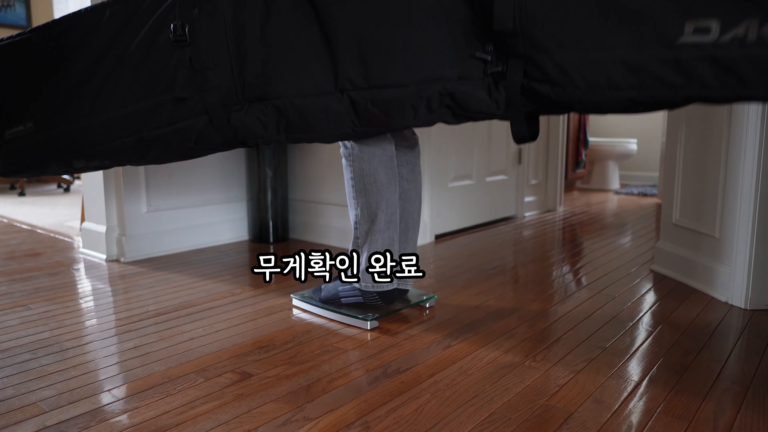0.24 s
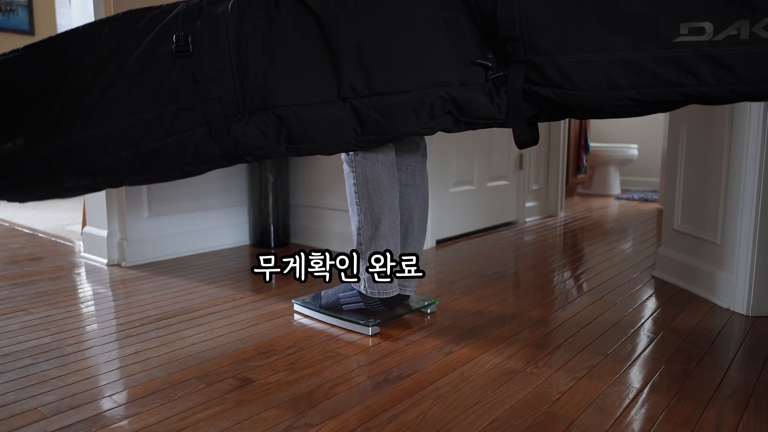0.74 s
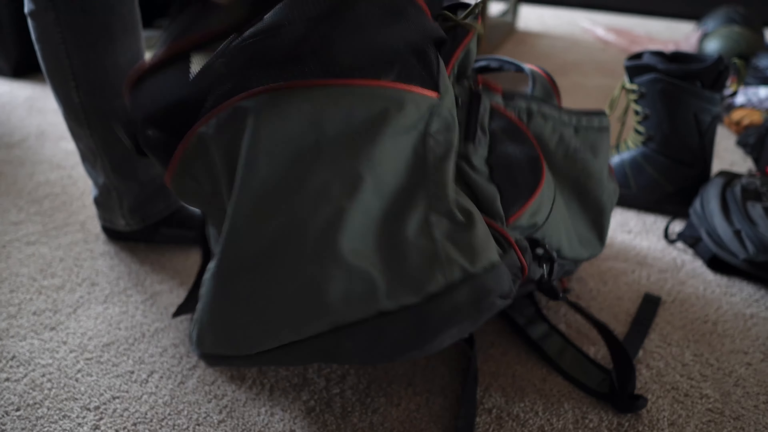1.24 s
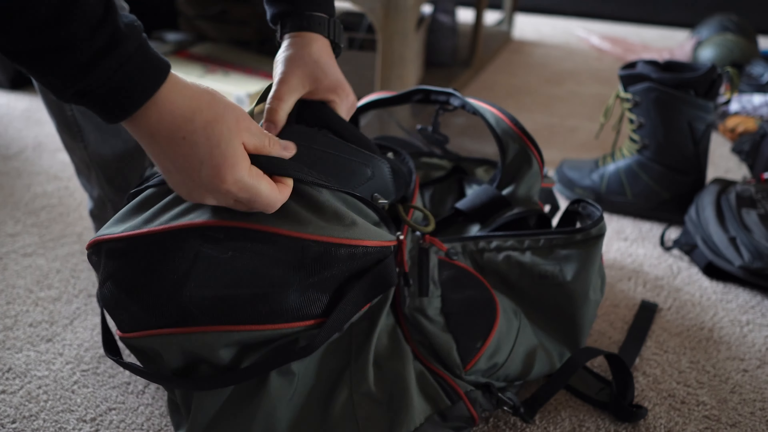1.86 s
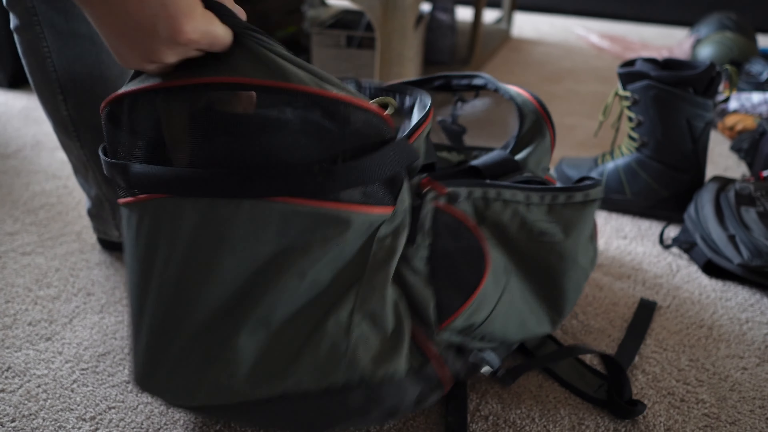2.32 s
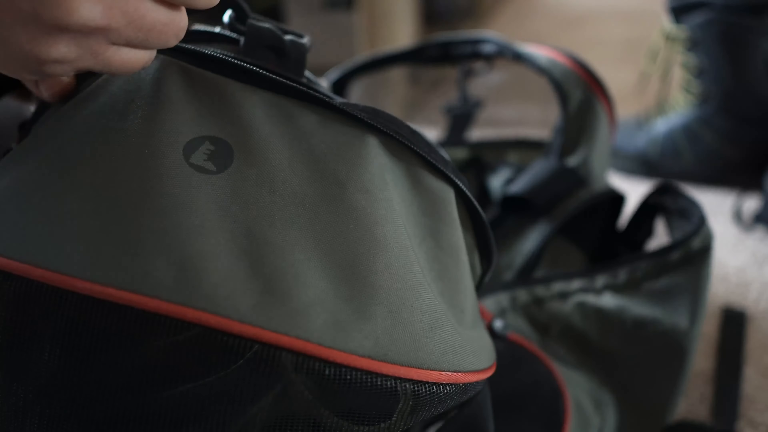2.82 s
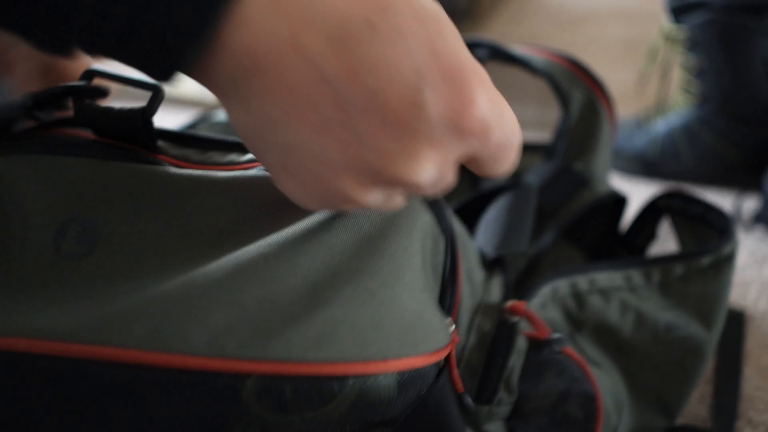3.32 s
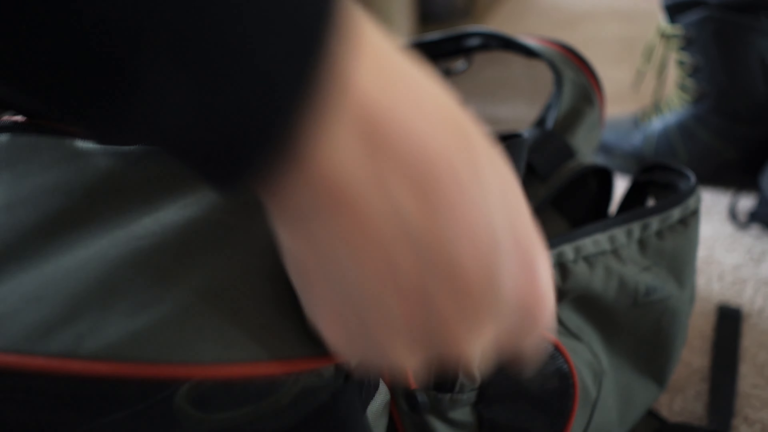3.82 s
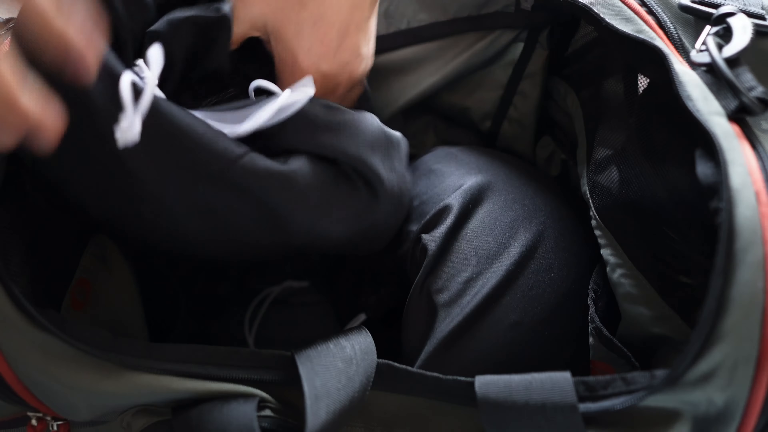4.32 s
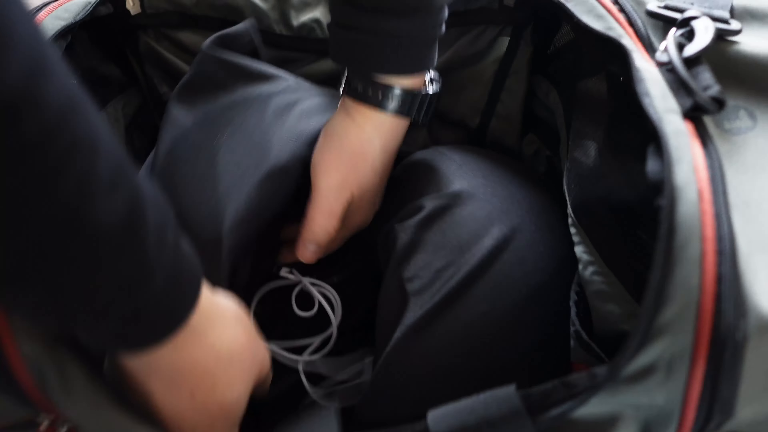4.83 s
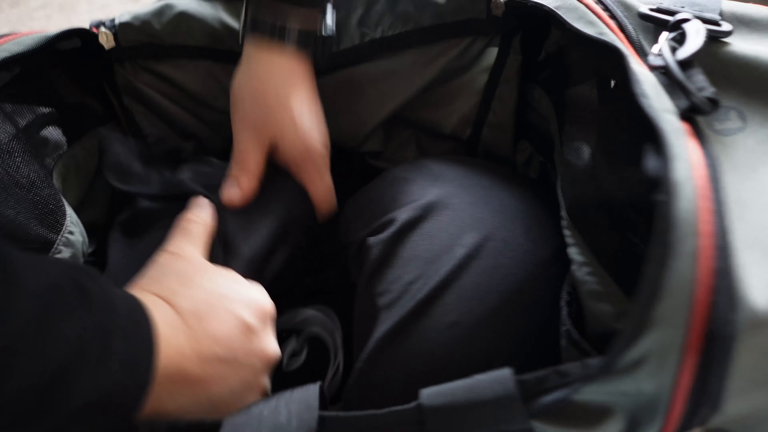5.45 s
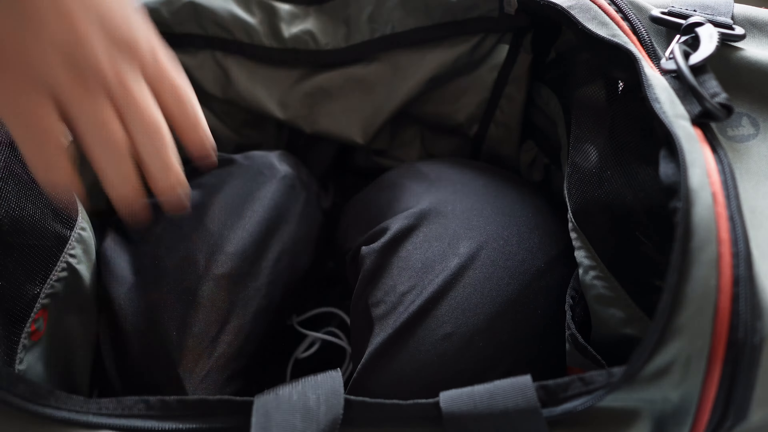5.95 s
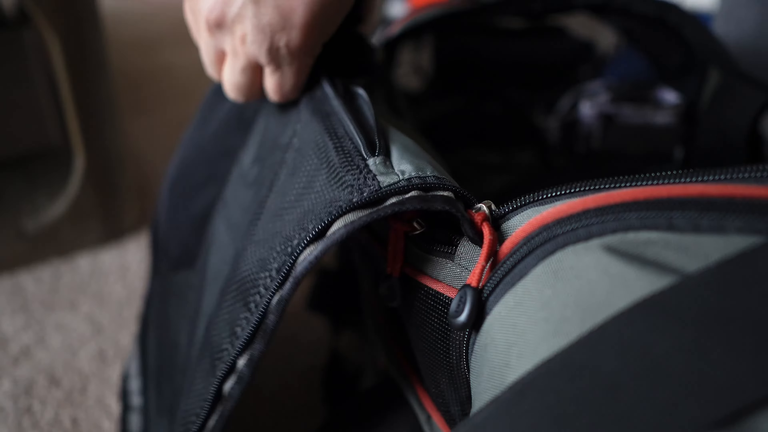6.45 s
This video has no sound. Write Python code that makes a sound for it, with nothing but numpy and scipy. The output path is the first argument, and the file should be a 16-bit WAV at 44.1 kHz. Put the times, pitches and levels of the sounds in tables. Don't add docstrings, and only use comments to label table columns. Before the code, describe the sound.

Stiff fabric rustles lightly, then loudly as a soft load is shoved into a bag, with low muffled thumps, pops and small taps. Two brief zipper pulls buzz, the second shorter and catching at its end. Duller cloth stuffing follows, with a hard snap midway, a quiet pause and a final rising rustle. Dry, detailed close stereo microphones, little echo, faint steady hiss.

```python
import sys
import numpy as np
from scipy import signal
from scipy.io import wavfile
from scipy.ndimage import uniform_filter1d

SR = 44100
rng = np.random.default_rng(int(sys.argv[2]) if len(sys.argv) > 2 else 0)


def bounce(signal):
    frames = np.transpose(np.atleast_2d(signal))
    limited = np.clip(frames, -1, 1)
    pcm = np.round(limited * 32767).astype(np.int16)
    wavfile.write(sys.argv[1], SR, pcm)


def convert_level_to_amplitude(level_db):
    exponent = np.asarray(level_db, float) / 20
    return 10 ** exponent


N = 294588

# start_s, polarity (+1 or -1)
SHOT_STARTS = [
    (0, 1),
    (1.0215, -1),
    (2.733, 1),
    (4.2755, -1),
    (6.33, -1),
    (7, 1),
]


def evened(x):
    return x / np.sqrt(np.mean(x ** 2) + 1e-20)


def colour(x, points):
    hz, db = np.transpose(points)
    grid_hz = np.fft.rfftfreq(4096, 1 / SR)
    half = np.interp(np.log(grid_hz + 1), np.log(hz + 1), np.maximum(db, -100))
    log_gain = np.r_[half, half[-2:0:-1]] * np.log(10) / 20
    taps = np.fft.ifft(np.exp(np.conj(signal.hilbert(log_gain)))).real[:2048]
    return signal.oaconvolve(x, taps)[:len(x)]


def add(mix, s, sound):
    part = mix[round(s * SR):][:len(sound)]
    part += sound[:len(part)]


def resonate(x, hz, width):
    turn = np.exp(2j * np.pi * np.cumsum(hz * np.ones(len(x))) / SR)
    r = np.exp(-np.pi * width / SR)
    return 2 * (turn * signal.lfilter([1 - r], [1, -r], x / turn)).real


def drift(seconds):
    size = max(round(seconds * SR), 1)
    smooth = uniform_filter1d(rng.standard_normal(N), size)
    return evened(uniform_filter1d(smooth, size))


def room(x, wet_db, t60):
    t = np.arange(SR // 3) / SR
    tail = rng.standard_normal(len(t)) * convert_level_to_amplitude(-60 * t / t60) * np.minimum(t / 0.01, 1)
    return x + convert_level_to_amplitude(wet_db) * signal.oaconvolve(x, tail / np.linalg.norm(tail))[:N]


def microphone(x):
    return signal.sosfilt(signal.butter(4, 160, "high", fs=SR, output="sos"), x)


def slips(per_s, spread_db, burst_s, clump_db):
    chance, size, grit = rng.random(N), rng.exponential(1, N), rng.standard_normal(N)
    starts = (chance < per_s / SR) * convert_level_to_amplitude(spread_db * np.minimum(size, 4)) ** 2
    power = signal.lfilter([1], [1, -np.exp(-1 / (burst_s * SR))], starts)
    return evened(grit * np.sqrt(power) * convert_level_to_amplitude(clump_db))


def hush():
    # frequency_hz, level_db
    spectrum = [(18, -78), (30, -28), (616, -5), (866, 6), (1010, -1), (1220, 4.5), (3580, 4.5),
                (7000, -0.5), (14400, -9), (16000, -52)]
    hiss_db = [.1, .1, -3, .1, .1]
    hum_db = [-8, -4, 1, 3, 0.5]
    noise = convert_level_to_amplitude(-62.5) * evened(colour(rng.standard_normal(N), spectrum))
    low = signal.sosfiltfilt(signal.butter(2, 1100, fs=SR, output="sos"), noise)
    starts = [s for s, _ in SHOT_STARTS]
    shot = np.searchsorted(starts, np.arange(N) / SR, side="right") - 1
    return convert_level_to_amplitude(np.array(hiss_db))[shot] * (noise - low) + convert_level_to_amplitude(np.array(hum_db))[shot] * low


def thuds():
    # start_s, peak_db, pitch_hz
    landings = [(.217, -49, 358), (.299, -44, 380), (1.076, -50, 282), (1.126, -38, 288), (1.203, -38, 266),
                (1.252, -36, 184), (1.305, -29, 210), (1.419, -41, 274), (1.545, -42, 335),
                (1.633, -37, 190), (1.65, -38, 179), (2.204, -34.5, 215), (2.249, -40, 185),
                (2.29, -44, 345), (4.035, -48, 220), (4.104, -50, 262), (4.458, -44, 246),
                (4.724, -49, 270), (5.028, -61, 207), (5.451, -35, 260), (5.479, -35.5, 240),
                (5.518, -42, 257)]
    t60_s, swell_s = 0.044, 0.0046
    out, t = np.zeros(N), np.arange(SR // 5) / SR
    for s, db, hz in landings:
        envelope = convert_level_to_amplitude(db + 3.5 - 60 * t / t60_s) * (1 - np.exp(-t / swell_s))
        add(out, s, envelope * np.sin(2 * np.pi * hz * t))
    return out


def drags():
    # start_s, length_s, level_db, first_hz, last_hz
    seams = [
        (2.017, 0.033, -30.5, 2720, 2530),
        (2.083, 0.047, -37, 3300, 3600),
        (2.174, 0.043, -30.5, 2000, 2500),
        (5.015, .05, -38, 3140, 2400),
        (1.245, .04, -39.5, 650, 720),
        (5.17, 0.055, -43, 4900, 4500),
    ]
    width_hz = 450
    out, chatter = np.zeros(N), slips(per_s=840, spread_db=3.0, burst_s=.0015, clump_db=0)
    for s, length, db, first_hz, last_hz in seams:
        drive = chatter[round(s * SR):][:round(length * SR)]
        hz = np.linspace(first_hz, last_hz, len(drive))
        sung = resonate(resonate(drive, hz, width_hz), hz, width_hz)
        add(out, s, convert_level_to_amplitude(db) * evened(sung) * signal.windows.tukey(len(drive), .6))
    return out


def snaps():
    # start_s, peak_db, ring_hz
    stiff = [(.279, -11.5, 1900), (0.392, -29, 2300), (.528, -31, 6600), (0.724, -31.5, 9000),
             (.79, -31, 8900), (0.798, -38, 5740), (0.809, -29.5, 8700), (0.925, -37, 4010),
             (1.099, -26, 1470), (1.108, -14, 3500), (1.303, -15.5, 636), (2.566, -21.5, 4800),
             (2.715, -30, 1260), (3.376, -21.5, 2880), (4.477, -15, 4500), (4.571, -9, 1960),
             (5.2325, -15, 2380), (5.474, 2.5, 2900), (5.553, -23, 3170), (5.4822, -11, 3900),
             (1.3, -18, 6500)]
    # start_s, peak_db, ring_hz
    creases = [(0.162, -35, 2730), (.661, -34.5, 8700), (0.705, -38, 6140), (0.874, -37, 3560),
               (.915, -30, 6600), (.978, -36, 8450), (1.187, -13, 790), (1.216, -12.5, 2570),
               (1.336, -23, 1410), (1.397, -19.5, 1730), (1.423, -14, 2450), (1.437, -16, 3770),
               (1.449, -29, 3050), (1.587, -25, 1400), (1.601, -20, 1500), (1.807, -21.5, 4040),
               (2.16, -17, 2670), (2.183, -14, 2150), (3.621, -36, 1950), (5.37, -28, 2600),
               (5.484, -16, 3600), (5.495, -27, 6000), (5.644, -28, 1920), (1.484, -22, 4060),
               (2.465, -32, 1920), (3.924, -23, 6000), (5.005, -28, 3300), (5.052, -17.5, 2500),
               (5.26, -21, 2300), (5.176, -29, 3000)]
    # start_s, peak_db, ring_hz
    taps = [(1.051, -14.5, 1850), (1.064, -24, 1610), (1.068, -19, 1810), (1.077, -16, 1560),
            (1.258, -18, 2760), (1.357, -18, 4150), (1.495, -31, 1720), (1.517, -22, 2400),
            (1.713, -35.5, 700), (1.88, -27, 2710), (1.889, -23, 2820), (1.954, -19.5, 1200),
            (1.955, -12, 2000), (2.335, -21.5, 1500), (2.353, -26, 1500), (2.633, -26, 2420),
            (3.294, -22, 2670), (3.688, -32.5, 1780), (4.191, -38, 1133), (4.458, -18, 4270),
            (4.538, -23, 3500), (2.942, -24, 1630), (4.463, -30.5, 870), (6.14, -18.5, 2840),
            (4.017, -39.5, 810), (6.14, -37, 1340), (6.592, -38, 900), (3.893, -31, 267), (3.914, -36, 298),
            (3.295, -37, 900)]
    # start_s, peak_db, ring_hz
    ticks = [(.433, -31, 2000), (.684, -41, 9000), (.708, -36, 6230), (.733, -36, 2160), (.733, -50, 900),
             (.755, -35, 7000), (.775, -42.5, 6000), (.8, -36, 6000), (.822, -32, 8000), (.827, -35, 7000),
             (.833, -37, 4000), (1.036, -25, 2050), (1.051, -23, 1010), (1.105, -17, 3300),
             (1.308, -22, 650), (1.361, -20, 4300), (1.428, -21, 2200), (1.44, -20.5, 1790),
             (1.465, -30, 794), (1.501, -24, 5000), (1.518, -25, 1300), (1.551, -29, 1010),
             (1.612, -26, 2500), (1.729, -28, 2500), (2.188, -20, 1210), (2.312, -20, 2200),
             (2.6, -37, 900), (4.447, -22, 4000), (5.03, -22, 1700), (5.043, -23, 2000), (5.072, -23, 3000),
             (5.234, -25.5, 1200), (5.372, -29, 1100), (5.4743, -13.5, 1290), (5.695, -36, 1010)]
    # t60_s, crack_db (re ring), ring_width (share of pitch), hardest_slip (re puff)
    kinds = [
        (0.026, 4.5, 0.47, 5),
        (0.02, -4.5, 0.35, 7),
        (0.014, -13.5, .26, 9),
        (.012, -9, .36, 9),
    ]
    # frequency_hz, level_db
    crack_shape = [(150, -48), (400, -30), (1000, -11.5), (3000, 9), (8000, 2.5), (16000, -14.5)]
    rise_s = .0008
    out, t = np.zeros(N), np.arange(SR // 20) / SR
    hits = [row + kind for rows, kind in zip([stiff, creases, taps, ticks], kinds) for row in rows]
    for s, db, hz, t60, crack_db, share, hardest in hits:
        decay = convert_level_to_amplitude(-70 * t / np.clip(t60, .005, .06))
        puff = rng.standard_normal(len(t)) * np.minimum(t / rise_s, 1) * decay
        puff[round(rise_s * SR)] += hardest
        ring = evened(resonate(resonate(puff, hz, share * hz), hz, 1.97 * share * hz))
        burst = ring + convert_level_to_amplitude(crack_db) * evened(colour(puff, crack_shape))
        add(out, s, convert_level_to_amplitude(min(db, -.8)) * burst / abs(burst).max())
    return room(out, wet_db=-16, t60=.1)


def zipper():
    # time_s, teeth_per_s, level_db, tape_resonance_hz
    pulls = [
        [(2.84, 245, -51, 1480), (2.88, 280, -50, 1500), (2.908, 255, -43.5, 1480), (2.934, 270, -41, 1500),
         (2.947, 330, -32.5, 1640), (2.958, 340, -46, 1590), (2.968, 380, -34, 1650)],
        [(2.964, 405, -31, 830), (2.992, 430, -30, 870), (3.008, 415, -30, 840), (3.031, 445, -29, 890)],
        [(3.029, 450, -28.5, 900), (3.034, 475, -27, 950), (3.052, 455, -26, 910), (3.07, 470, -25.5, 940),
         (3.078, 432, -25, 865), (3.09, 452, -24, 900), (3.099, 428, -23.5, 860), (3.102, 470, -23.5, 940)],
        [(3.101, 480, -23.5, 960), (3.105, 522, -24, 1040), (3.116, 522, -23, 1045), (3.12, 622, -20.5, 1245),
         (3.128, 630, -21.5, 1260), (3.132, 540, -26, 1080)],
        [(3.131, 540, -26, 1080), (3.141, 500, -27, 1000), (3.146, 438, -26, 875), (3.16, 428, -25.5, 855),
         (3.17, 415, -35, 830)],
        [(3.164, 290, -36, 900), (3.178, 280, -37, 1000), (3.19, 240, -37.5, 1100), (3.21, 230, -55, 1100)],
        [(3.76, 400, -50, 1600), (3.784, 378, -44, 780), (3.799, 385, -39, 800), (3.803, 390, -30, 850),
         (3.812, 392, -30, 850), (3.819, 368, -38, 900), (3.826, 350, -33, 1050), (3.835, 350, -35, 1200)],
        [(3.834, 395, -32, 1200), (3.838, 410, -25, 1240), (3.846, 425, -25, 1300), (3.852, 455, -23, 1400),
         (3.859, 430, -26, 1400), (3.868, 375, -29, 1450), (3.875, 342, -33, 1400), (3.888, 300, -36, 1800)],
        [(3.884, 146, -40, 1900), (3.897, 165, -36, 1890), (3.907, 140, -44, 2300), (3.921, 166, -38, 2280),
         (3.93, 160, -48, 1500)],
    ]
    # unevenness (0-1), panel_sway_db (re tape), tape_width_hz, slider_db
    grips = [
        (0.03, -23, 260, -4),
        (.08, -38, 260, -4),
        (0.07, -13.5, 270, -2),
        (0.16, -11, 310, -5),
        (.1, -32, 300, -2),
        (.2, -44, 880, 4),
        (.1, -26, 550, 2),
        (0.07, -12.5, 560, 2.5),
        (-.3, -54, 350, -6),
    ]
    # pitch_hz, width_hz, level_db
    slider = [(800, 400, -14), (1900, 500, -9), (2400, 700, -16)]
    easy_per_s = 400
    uneven_per_octave, sway_db_per_octave = .3, 18.5
    out = np.zeros(N)
    tremble = 1 + .032 * drift(0.004)
    for rows, (catch, shake_db, width_hz, slider_db) in zip(pulls, grips):
        s, *columns = np.transpose(rows)
        t = np.arange(s[0], s[-1], 1 / SR)
        rate, db, tape_hz = (np.interp(t, s, c) for c in columns)
        slow = np.log2(easy_per_s / rate)
        uneven = np.clip(catch + uneven_per_octave * slow, 0, 1)
        sway_db = shake_db + sway_db_per_octave * slow
        wobble, strength, grit = rng.standard_normal((3, len(t)))
        rate = rate * (1 + 0.51 * uneven * evened(uniform_filter1d(wobble, size=200)))
        rate = rate * tremble[round(s[0] * SR):][:len(t)]
        turns = np.cumsum(rate) / SR
        teeth = np.diff(np.floor(turns), prepend=0) * convert_level_to_amplitude(11.7 * uneven * strength)
        scrape = grit * np.exp(-(turns % 1) / 0.092)
        drive = evened(teeth) + .9 * uneven * evened(scrape)
        tape = resonate(resonate(drive, tape_hz, width_hz), tape_hz, 1.37 * width_hz)
        rings = np.zeros(len(t))
        for k, (hz, w, g) in enumerate(slider):
            rings += (-1) ** k * convert_level_to_amplitude(g) * resonate(resonate(drive, hz, w), hz, w)
        sway = convert_level_to_amplitude(sway_db) * resonate(resonate(drive, rate, 130), rate, 130)
        tone = tape + convert_level_to_amplitude(slider_db) * rings + sway
        tone = tone / np.sqrt(uniform_filter1d(tone ** 2, size=900) + 1e-9)
        add(out, s[0], convert_level_to_amplitude(db) * tone * signal.windows.tukey(len(t), .04))
    return room(out, wet_db=-13, t60=.14)


def patchy(x, patchy_db):
    z = signal.stft(x, nperseg=256)[2]
    patches = uniform_filter1d(rng.standard_normal(z.shape), size=5, axis=0)
    patches = uniform_filter1d(patches, size=14, axis=1)
    return signal.istft(z * convert_level_to_amplitude(patchy_db * evened(patches)), nperseg=256)[1][:N]


def folds(drive, points):
    near = room(colour(drive, points), wet_db=-13.0, t60=0.23)
    return evened(microphone(patchy(near, patchy_db=2.0)))


def strokes(rows, t, db=0):
    swing_db = 20
    s, peak_db, rise_s, fall_s = np.transpose(rows)[:4, :, None]
    away = np.maximum((s - t) / np.maximum(rise_s, .01), (t - s) / np.maximum(fall_s, .01))
    power = (convert_level_to_amplitude(peak_db + db - swing_db * away) ** 2).sum(0)
    return np.sqrt(abs(uniform_filter1d(power, size=300)))


def rustle():
    # frequency_hz, density_db (per Hz)
    crinkle_shape = [(240, -33.5), (400, -20), (468, -19), (639, -7.5), (983, -6), (1340, 5.5), (1650, 3),
                     (2610, 5.5), (4820, 1.5), (9000, -10.5), (11700, -25), (19800, -120)]
    # frequency_hz, density_db (per Hz)
    clothes_shape = [(240, -59), (400, -12), (656, -17), (1230, -1), (1810, -0.5), (2350, 1), (3620, 0),
                     (9000, -16), (11700, -18), (19800, -120)]
    # frequency_hz, density_db (per Hz)
    taut_shape = [(240, -35), (400, -19), (640, -11), (1000, -4.5), (1340, 2.5), (2610, 2), (4820, -2.5),
                  (9000, -17.5), (11700, -32), (19800, -120)]
    # frequency_hz, density_db (per Hz)
    weave_shape = [(3000, -29), (5000, 1.5), (7000, 0.5), (10000, -3), (13000, -3), (15900, -3)]
    # frequency_hz, density_db (per Hz)
    body_shape = [(35, -49), (60, -9), (123, -21.5), (165, -17), (205, -13), (243, -12), (464, -10),
                  (621, -3), (1100, 0), (1430, -32), (2420, -120)]
    # peak_s, effort_db, rise_s, fall_s, slide_db (re effort)
    lifting = [(0.0, -40.5, .1, 0.16, -11.5), (0.169, -51.5, 0.059, .3, -2.5),
               (0.214, -37.5, 0.029, 0.32, -17), (.29, -38, 0.027, 0.29, -8), (.8, -53.5, 0.26, 0.26, 6)]
    loading = [(1.03, -33, 0.041, .3, -8), (1.068, -26, 0.05, 0.27, -10), (1.116, -25, 0.089, 0.2, -3),
               (1.2, -36, 0.22, 0.28, -17.5), (1.296, -31, 0.21, 0.032, -1), (1.436, -34, 0.28, 0.12, -1.5),
               (1.52, -36, 0.33, 0.54, -23.5), (1.6, -40, 0.13, 0.049, 4), (1.65, -43, 0.054, 0.095, 8.5),
               (1.77, -49.5, 0.22, 0.17, 9), (1.87, -38, 0.28, 0.26, -22), (1.995, -28, 0.14, 0.49, -4.5),
               (2.19, -27.5, 0.1, 0.35, -10), (2.294, -28, 0.25, 0.026, -2), (2.34, -54, .1, 0.61, 0),
               (2.47, -43.5, 0.37, 0.38, 1), (2.585, -35, 0.036, 0.025, 6.5), (2.63, -44.5, 0.1, 0.25, -2),
               (2.72, -42.5, 0.63, 0.27, -19)]
    zipping = [(2.735, -88, .1, 0.093, -22), (2.968, -33.5, 0.097, 0.51, 2.5), (3.07, -33.5, 0.23, .15, -7),
               (3.145, -26.5, 0.24, 0.063, -23), (3.25, -48, 0.071, 0.3, -12), (3.37, -42, 0.5, 0.12, -14),
               (3.6, -49, 0.12, 0.23, -11), (3.71, -49.5, 0.11, 0.18, -19), (3.8, -34, 0.049, 0.19, -13),
               (3.852, -38.5, .04, .06, 2), (3.91, -41.5, 0.16, 0.07, 3.5), (4.03, -42, 0.019, 0.38, -12),
               (4.09, -42, 0.063, 0.13, 4), (4.15, -38.5, 0.17, 0.037, -4), (4.276, -46, 0.018, 0.082, -13)]
    stuffing = [(4.28, -43, 0.13, 0.4, 1), (4.4, -42.5, 0.45, 0.32, -12), (4.46, -33, 0.079, 0.041, -5),
                (4.52, -40, 0.11, 0.34, 5), (4.578, -37, 0.06, 0.93, 2.5), (4.63, -39, .3, 0.28, -1),
                (4.76, -33.5, 0.21, 0.34, -6), (4.81, -40, .1, 0.1, 4.5), (4.85, -47, 0.54, 0.041, 1),
                (4.96, -56, 0.24, .2, -14), (5.028, -28, 0.053, 0.056, -7),
                (5.052, -31.5, 0.033, 0.033, -16), (5.076, -32.5, 0.027, 0.061, -5.5),
                (5.18, -35.5, 0.13, 0.65, 2), (5.3, -36.5, 0.57, 0.26, 0.5), (5.41, -36, 0.64, 0.27, -14),
                (5.47, -28.5, 0.17, 0.068, 1.5), (5.5, -38.5, 0.11, 0.23, -9),
                (5.7, -35.5, 0.16, 0.21, -2.5), (5.76, -43.5, 0.28, 0.09, 4.5),
                (5.88, -47, 0.24, 0.34, -24), (6.135, -43.5, 0.15, 0.32, -10), (6.33, -48.5, 0.14, .3, -6)]
    opening = [(6.33, -47.5, .1, 0.18, -2), (6.5, -47, 0.31, 0.28, 6), (6.6, -41.5, 0.094, 0.44, 1.5),
               (6.68, -30.5, 0.16, .2, -5)]
    # peak_s, level_db, rise_s, fall_s
    heaves = [(0.0, -39.5, .1, .12), (.28, -40.5, 0.15, 0.49), (.5, -70, 0.23, 0.18),
              (1.069, -27.5, 0.018, 0.068), (1.18, -30.5, 0.13, 0.43), (1.3, -36, 0.3, 0.062),
              (1.44, -33.5, 0.24, 0.36), (1.7, -45, 0.45, .25), (2.2, -34.5, 0.092, 0.43),
              (2.3, -33.5, 0.38, 0.18), (2.55, -49, 0.24, 0.69), (2.73, -51, 0.18, 0.027),
              (2.86, -40.5, 0.016, 0.43), (2.97, -32.5, 0.1, 0.041), (3.21, -44.5, 0.16, 0.32),
              (3.39, -48.5, 0.47, 0.093), (3.65, -58.5, 0.28, 0.88), (3.85, -27.5, 0.033, 0.12),
              (3.91, -29.5, 0.14, 0.046), (4.05, -47, 0.092, 1), (4.46, -38, 0.061, 0.059),
              (4.6, -45, 1, 0.45), (4.8, -41, .15, 0.18), (5.03, -41, 0.53, 0.18),
              (5.25, -45.5, 0.46, 0.91), (5.47, -29.5, 0.064, 0.1), (5.82, -52.5, 0.41, 0.27),
              (6.2, -55, .2, .3), (6.62, -56, 0.13, .3)]

    clump = drift(0.054)
    fibres = slips(per_s=60, spread_db=4.2, burst_s=0.0009, clump_db=1.5 * clump)
    shared = slips(per_s=2200, spread_db=0.0, burst_s=0.0021, clump_db=0.82 * clump) + 0.08 * fibres
    fine = slips(per_s=1900, spread_db=4.5, burst_s=0.0096, clump_db=1.4 * clump) + 0.25 * fibres
    nylon, clothes, taut = (folds(shared, shape) for shape in (crinkle_shape, clothes_shape, taut_shape))
    threads = colour(0.16 * shared + fine, weave_shape)
    weave = evened(microphone(patchy(threads, patchy_db=2.0)))
    flexing = slips(per_s=390, spread_db=2.0, burst_s=0.0059, clump_db=0.46 * drift(0.034))
    body = evened(microphone(colour(flexing, body_shape)))

    t, out = np.arange(N) / SR, np.zeros(N)
    shots = zip([lifting, loading, zipping, stuffing, opening], [nylon, nylon, taut, clothes, nylon])
    for (rows, crinkle), (start, sign), (end, _) in zip(shots, SHOT_STARTS, SHOT_STARTS[1:]):
        now = (t >= start) & (t < end)
        effort = strokes(rows, t[now])
        slide = strokes(rows, t[now], np.array(rows)[:, -1:])
        heave = strokes([row for row in heaves if start <= row[0] < end], t[now])
        cloth = convert_level_to_amplitude(-1.5) * effort * crinkle[now] + convert_level_to_amplitude(-1.5) * slide * weave[now]
        out[now] = sign * (cloth + convert_level_to_amplitude(-9.0) * heave * body[now])
    return out


def port_difference(mid):
    # frequency_hz, level_db (re their sum)
    port_gap = [(200, -45), (500, -21), (1200, -26), (3000, -14.5), (6000, -12), (9000, -5), (15000, -2)]
    # time_s, side_db
    off_axis = [(.1, .1), (.38, -3), (.62, 3), (.95, 3), (1.1, -5), (1.4, -2.5), (1.62, -4), (2.3, .1),
                (2.62, 4), (3.1, -2), (3.5, 4), (4.35, 3), (4.9, -2), (5.15, -3), (5.6, .1), (5.9, 3),
                (6.6, 2)]
    z = signal.stft(mid, nperseg=128)[2]
    paths = np.exp(2j * np.pi * rng.random(z.shape))
    scattered = signal.istft(z * paths, nperseg=128)[1][:N]
    width = convert_level_to_amplitude(np.interp(np.arange(N) / SR, *np.transpose(off_axis)) - 1.5)
    return width * (microphone(colour(1.05 * scattered, port_gap)) + 0.071 * mid)


def scene():
    mid = rustle() + microphone(snaps() + thuds() + zipper() + drags())
    side = port_difference(mid)
    shared, own = hush(), hush()
    return np.array([mid + shared + side + 0.5 * own, mid + shared - side - 1.26 * own])


def roll_off(x):
    return signal.sosfilt(signal.butter(12, 16810, fs=SR, output="sos"), x)


def record(dry):
    edge = signal.firwin(401, 15800, window=("kaiser", 8), fs=SR)
    mix = signal.oaconvolve(dry, edge[None], "same")
    return roll_off(mix)


dry = scene()
out = record(dry)
bounce(out)
```